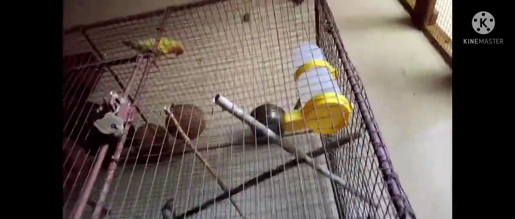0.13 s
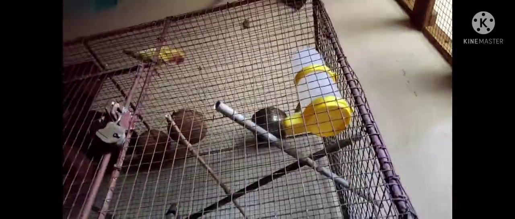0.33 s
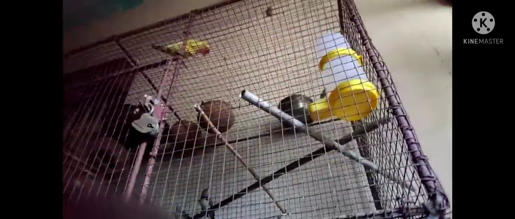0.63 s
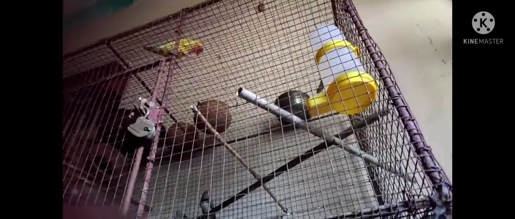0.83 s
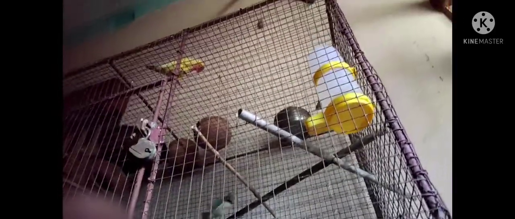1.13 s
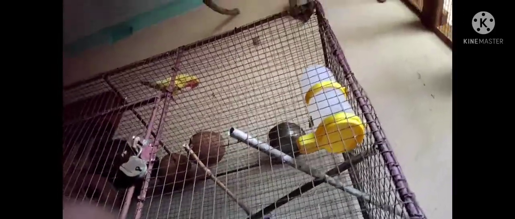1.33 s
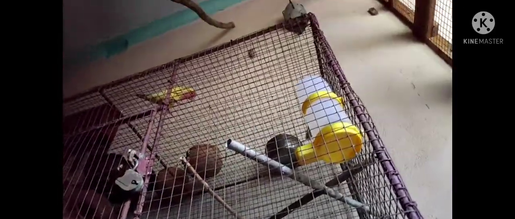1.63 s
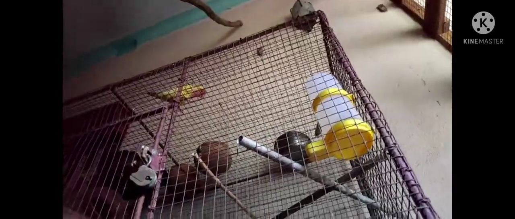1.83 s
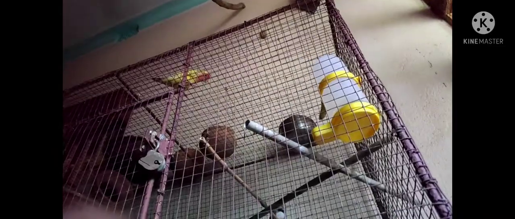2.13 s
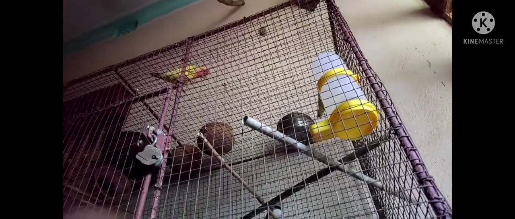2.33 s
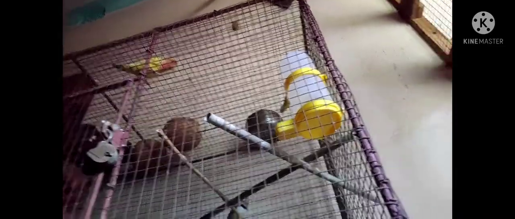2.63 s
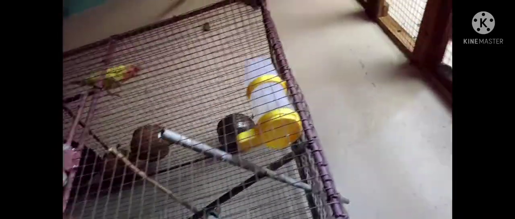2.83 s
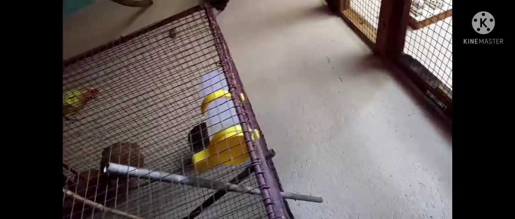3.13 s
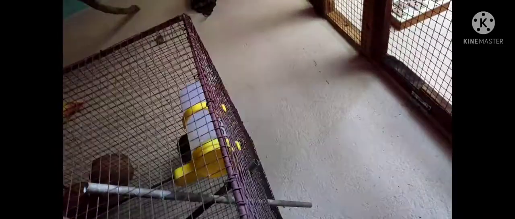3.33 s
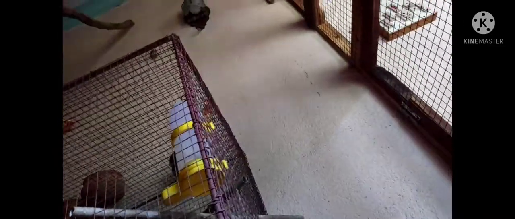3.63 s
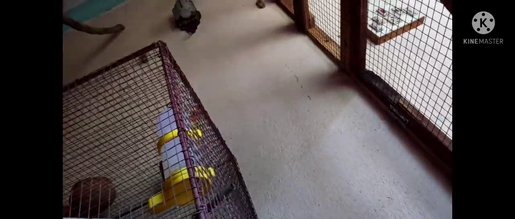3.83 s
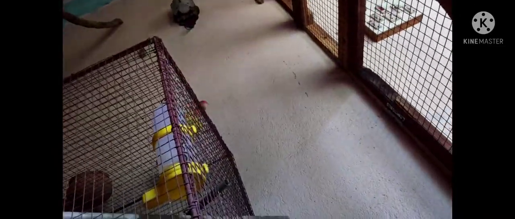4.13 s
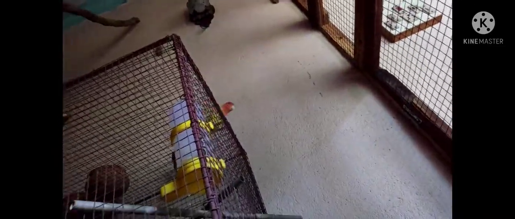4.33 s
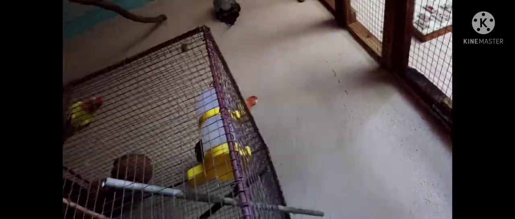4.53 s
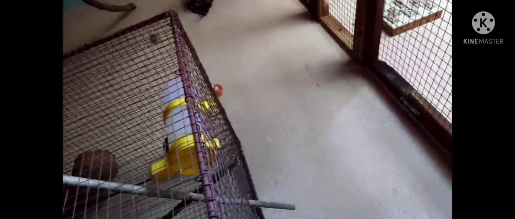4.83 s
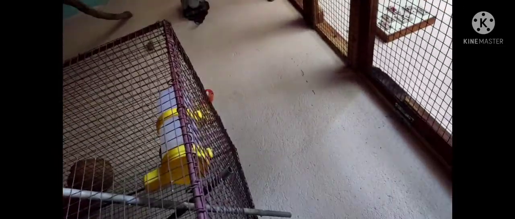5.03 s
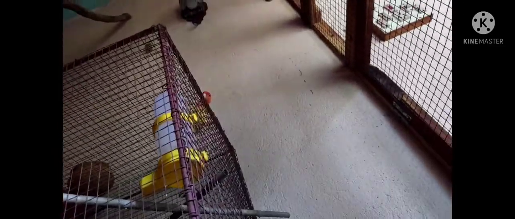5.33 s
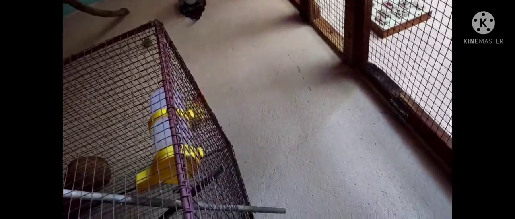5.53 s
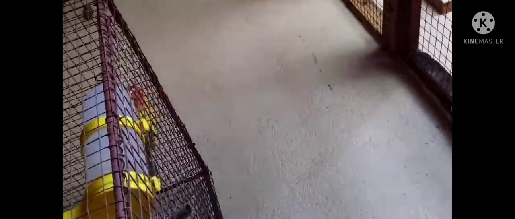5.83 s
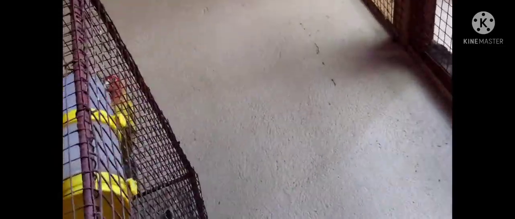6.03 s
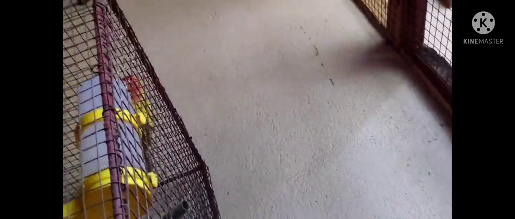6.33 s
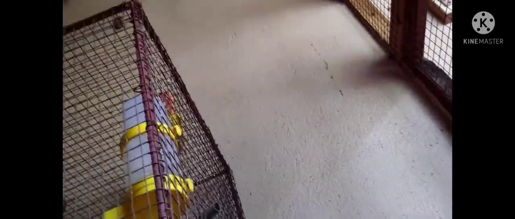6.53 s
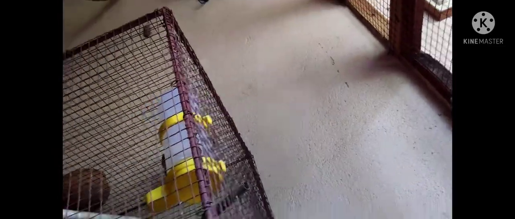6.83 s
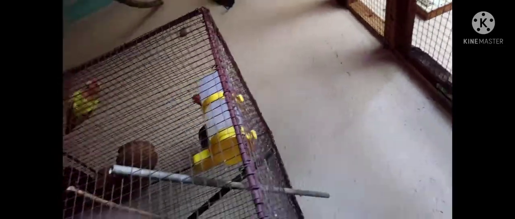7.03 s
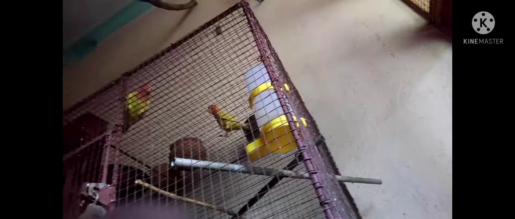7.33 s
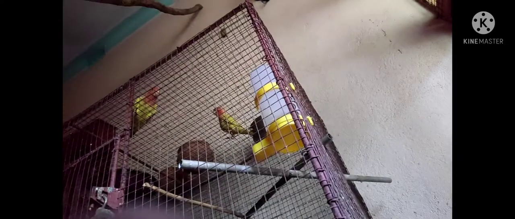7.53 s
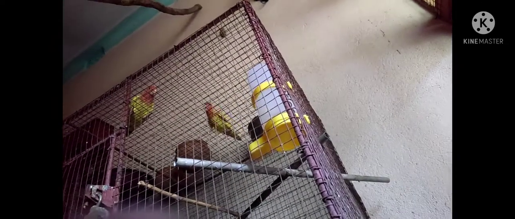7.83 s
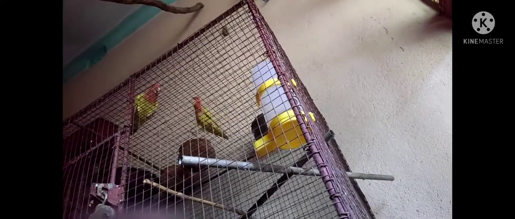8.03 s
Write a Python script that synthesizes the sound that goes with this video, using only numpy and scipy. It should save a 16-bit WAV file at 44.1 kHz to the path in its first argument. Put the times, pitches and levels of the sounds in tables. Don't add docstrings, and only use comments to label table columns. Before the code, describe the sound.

Shrill gliding whistles with a raspy edge ring briefly off hard walls. Isolated chirps lead to a rapid chattering screech, then quieter scuffs, another outburst with wingbeats, a short sharp call, and a final flurry over steady flapping. The hand-held microphone picks up dull bumps, bass rumble, faint room air, a far hum and a distant hoarse call.

```python
import sys
import numpy as np
from scipy import signal
from scipy.fft import rfft, irfft
from scipy.io import wavfile
from scipy.ndimage import uniform_filter1d, minimum_filter1d

SR = 44100
rng = np.random.default_rng(int(sys.argv[2]) if len(sys.argv) > 2 else 0)


def magnitude_from_level(level_db):
    exponent = np.asarray(level_db, float) / 20
    return 10 ** exponent


def int16_out(signal):
    q = np.round(np.clip(np.atleast_2d(signal).T, -1, 1) * 32767)
    wavfile.write(sys.argv[1], SR, q.astype(np.int16))


N = 360297


def evened(x):
    return x / np.sqrt(np.mean(x ** 2) + 1e-20)


def read(points, hz):
    f, value = np.transpose(points)
    return np.interp(np.log(hz + 1), np.log(f + 1), value)


def add(mix, s, sound):
    part = mix[..., round(s * SR):][..., :sound.shape[-1]]
    part += sound[..., :part.shape[-1]]


def coloured(x, spectrum):
    size = x.shape[-1]
    return irfft(rfft(x) * magnitude_from_level(read(spectrum, np.fft.rfftfreq(size, 1 / SR))), size)


def wander(size, hz):
    width = int(SR / hz)
    return evened(uniform_filter1d(uniform_filter1d(rng.standard_normal(size), width), width))


def curve(tables, column):
    t, value, gate = np.arange(N) / SR, np.zeros(N), np.zeros(N)
    for rows in tables:
        rows = np.array(rows)
        inside = (t >= rows[0, 0]) & (t < rows[-1, 0])
        value[inside] = np.interp(t[inside], rows[:, 0], rows[:, column])
        gate[inside] = signal.windows.tukey(inside.sum(), .2)
    return value, gate


# frequency in Hz, likeness 0 to 1.
LIKENESS = [(30, 0.47), (300, 0.97), (600, 0.66), (1200, 0.26), (8000, 0.099)]


def pair(spectrum):
    a, b = rfft(rng.standard_normal((2, N)))
    hz = np.fft.rfftfreq(N, 1 / SR)
    same = np.clip(read(LIKENESS, hz), 0, 1)
    right = same * a + np.sqrt(1 - same ** 2) * b
    return evened(irfft(np.array([a, right]) * magnitude_from_level(read(spectrum, hz)), N))


# frequency in Hz, difference in dB.
PORT_SHADE = [(1000, 2), (3500, 1), (5000, -6.5), (7000, -12.5), (9000, -10.5), (12000, 0.5)]


def ports(x):
    return np.array([coloured(x[0], PORT_SHADE), x[1]])


# frequency in Hz, level in dB.
AIR_COLOUR = [(12, -37.5), (20, 6), (69, -16.5), (91, -14), (233, -17), (307, -16), (505, -22), (685, -22),
              (1160, -26.5), (2440, -30.5), (3120, -30), (5140, -35), (14700, -46.5)]


def room_air():
    return magnitude_from_level(-59 + 3.5 + 2.23 * wander(N, hz=15)) * pair(AIR_COLOUR)


# time in seconds, level in dB.
RUMBLE_LEVEL = [(0.0, -66), (0.2, -43.5), (1.14, -57.5), (1.48, -46), (1.55, -62), (1.75, -59),
                (1.87, -40.5), (2.43, -66), (4.0, -46), (4.05, -57.5), (6.78, -54), (7.87, -38.5),
                (7.96, -58), (8.17, -64)]


def handling_rumble():
    lumps = pair([(18, 5.0), (30, -2.5), (70, 0.0), (150, -19.0), (400, -50.0)])
    level_db = np.interp(np.arange(N) / SR, *np.transpose(RUMBLE_LEVEL))
    return magnitude_from_level(level_db) * lumps * magnitude_from_level([[3.5], [-5.5]])


# time in seconds, level in dB.
HUM_LEVEL = [(0.0, -65), (1.05, -66), (2.25, -103), (3.82, -54.5), (6.24, -70.5), (7.55, -64), (8.17, -86)]


def far_hum():
    t = np.arange(N) / SR
    level_db = np.interp(t, *np.transpose(HUM_LEVEL)) + 1.3 * wander(N, hz=20)
    return magnitude_from_level(level_db) * np.sin(2 * np.pi * 687 * t + 0.199 * wander(N, hz=6.7))


# time in seconds, level in dB, pitch in Hz.
FAR_CALL = [
    (4.9, -90, 2300),
    (5.002, -51, 2392),
    (5.46, -71, 2620),
]


def far_call():
    db, gate = curve([FAR_CALL], column=1)
    turns = np.cumsum(curve([FAR_CALL], column=2)[0]) / SR
    hoarse = np.array([wander(N, hz=856), wander(N, hz=894)])
    return magnitude_from_level(db) * gate * hoarse * np.sin(2 * np.pi * turns)


# start in seconds, low push in dB, tick in dB against the push.
THUMP_EVENTS = [(0.169, -29.5, -10), (0.216, -42, -7), (0.222, -47, 1), (0.226, -50, -17),
                (1.318, -38, -17), (1.364, -35, -19), (1.448, -30.5, -22.5), (1.49, -55, -8),
                (.25, -55, -5), (1.876, -32.5, -14), (4.53, -29.5, -28), (5.469, -39.5, -28.5),
                (6.414, -41, -16.5), (6.48, -38, -23)]


def thumps():
    out, t = np.zeros((2, N)), np.arange(4000) / SR
    push = 1.84 * np.sin(2 * np.pi * 45 * t) * np.exp(-t / 0.0068)
    push += 0.52 * np.sin(2 * np.pi * 170 * t) * np.exp(-t / 0.0094)
    push = push * magnitude_from_level([[2.5], [-2.5]])
    noise = uniform_filter1d(rng.standard_normal((len(THUMP_EVENTS), 2, 4000)), size=3)
    ticks = signal.lfilter([1, -1], [1, -1.6, .66], noise) * np.exp(-t / 0.0039)
    for (s, db, tick_db), tick in zip(THUMP_EVENTS, ticks):
        add(out, s, magnitude_from_level(db) * (push + magnitude_from_level(tick_db + 13.5) * tick))
    return out


# time in seconds, level in dB, beats per second.
FLUTTER_BOUTS = [
    [(3.56, -44, 19.1), (3.73, -37, 16.15), (4.02, -39.5, 17.5)],
    [(4.15, -44, 17.04), (4.43, -52, 17.1), (4.46, -58, 13.2)],
    [(6.77, -38.5, 16.74), (7.64, -37, 15.8), (7.96, -43.5, 19)],
]
# frequency in Hz, level in dB.
WING_COLOUR = [(71, -23.5), (120, -10), (162, -5), (201, -13.5), (465, -4.5), (1340, -18), (3540, -21),
               (4160, -28), (7260, -21.5), (11000, -33), (14000, -47.5)]


def flutter():
    db, gate = curve(FLUTTER_BOUTS, column=1)
    beat_hz = curve(FLUTTER_BOUTS, column=2)[0] * (1 + .2 * wander(N, hz=21.95))
    turns = np.cumsum(beat_hz) / SR
    puffs = 1.48 + np.sin(np.pi * turns) ** 2 * magnitude_from_level(8.2 * wander(N, hz=40.3))
    air = pair(WING_COLOUR)
    low = uniform_filter1d(uniform_filter1d(air, 16), 16)
    hiss = air - low
    return magnitude_from_level(db - 3.5) * gate * (evened(puffs) * low + hiss)


# start in seconds, level in dB, rise in seconds, drag in seconds, treble in dB.
SCUFF_EVENTS = [(0.136, -38.5, 0.013, 0.027, -33.5), (1.008, -38, 0.0058, 0.066, 0.5),
                (1.871, -42.5, 0.0046, 0.025, -27), (2.844, -40, 0.034, 0.064, 11),
                (3.314, -49.5, 0.0074, 0.23, -0.5), (3.363, -43, 0.0031, 0.04, -18),
                (3.989, -36, 0.004, 0.019, -14.5), (4.249, -47, 0.028, 0.09, 4.5),
                (5.158, -66.5, 0.0041, .015, 5.5), (5.243, -51.5, .012, .05, -19.5),
                (6.09, -58, 0.022, 0.044, 0), (6.35, -63, 0.035, 0.061, 4.5),
                (6.43, -62.5, 0.031, .06, -4.5), (7.579, -56, .002, .008, -16), (7.64, -50, .002, .008, -8),
                (6.742, -50, 0.03, 0.25, -2), (7.844, -43, 0.0055, 0.047, 6.5)]
# frequency in Hz, level in dB.
GRIT_COLOUR = [(120, -45), (200, -11), (842, -4.5), (1160, -9), (1820, -10), (2110, -5), (4810, -6),
               (6300, -3.5), (11400, -19.5), (14700, -36.5)]


def scuffs():
    grains = rng.standard_normal((2, N)) * magnitude_from_level(1.63 * wander(N, hz=294))
    grit = evened(coloured(grains, GRIT_COLOUR))
    dull = uniform_filter1d(grit, 12)
    treble = grit - dull
    out, t = np.zeros((2, N)), np.arange(14000) / SR
    for s, db, rise_s, drag_s, treble_db in SCUFF_EVENTS:
        at = slice(round(s * SR), round(s * SR) + len(t))
        drag = np.exp(-np.maximum(t - rise_s, 0) / drag_s)
        stroke = magnitude_from_level(db) * np.clip(t / rise_s, 0, 1) * drag
        add(out, s, stroke[:dull[0, at].size] * (dull[:, at] + magnitude_from_level(treble_db) * treble[:, at]))
    return out


# start in seconds, length in seconds, top level in dB, end level in dB.
MURMUR_EVENTS = [
    (2.112, 0.14, -44.5, -60.5),
    (2.29, .062, -47, -42),
    (5.535, .12, -39, -34),
    (6.36, .08, -42.5, -46.5),
    (.395, 0.066, -44, -52),
]
MURMUR_PITCH_HZ = (539, 584, 596)


def murmurs():
    start_hz, top_hz, end_hz = MURMUR_PITCH_HZ
    top_share, start_db = 0.28, -19
    return [[(s, db + start_db, start_hz), (s + top_share * length, db, top_hz), (s + length, end_db, end_hz)]
            for s, length, db, end_db in MURMUR_EVENTS]


# frequency in Hz, level in dB.
NOSE_COLOUR = [(500, -22), (1200, -14), (1800, -17), (2600, -3.5), (4000, 0), (5400, -1), (7000, -7),
               (14000, -41.5)]


def nasal():
    calls = murmurs()
    db, gate = curve(calls, column=1)
    hz = curve(calls, column=2)[0] * (1 + 0.0053 * wander(N, hz=119.5))
    phase = 2 * np.pi * np.cumsum(hz) / SR
    pulses = sum(np.cos(k * phase + k * k) for k in range(1, 20))
    voice = coloured(gate * pulses, NOSE_COLOUR)
    voice *= 1 + 0.47 * wander(N, hz=507)
    return magnitude_from_level(db - 3.5) * gate * voice / np.sqrt(np.mean(voice[gate > .5] ** 2))


# multiple of the pitch, level in dB.
WHISTLE_OVERTONES = [(2, -8.5), (3, -16)]
# frequency in Hz, lift in dB.
BEAK_LIFT = [(4000, -14), (7000, 5), (8500, -4.5), (10300, -8), (12500, -10), (15000, -11)]


def whistle(hz, sides, octave_db, lead_turns):
    phase = 2 * np.pi * np.cumsum(hz) / SR
    apart = 2 * np.pi * np.array([[0], [lead_turns]])
    tone = sides * np.sin(phase + apart)
    for k, over_db in list(WHISTLE_OVERTONES) + [(2, octave_db)]:
        shade = magnitude_from_level([read(PORT_SHADE, k * hz), 0 * hz])
        level = magnitude_from_level(over_db + read(BEAK_LIFT, k * hz)) * (k * hz < 16000)
        tone += shade * level * np.sin(k * phase + apart)
    return tone


# start in seconds, level in dB.
SCREECH_EVENTS = [
    (2.3515, -21),
    (3.997, -22),
    (7.92, -19.5),
]
# delay in seconds, length in seconds, start in Hz, slide in Hz/s, level in dB.
SCREECH_OPENING = [
    (0, 0.01, 6900, 7000, -2),
    (0, .009, 4424, 90000, 3),
    (.007, 0.014, 5600, 80000, 4),
]
# start in seconds, length in seconds, start pitch in Hz, level in dB.
RISING_NOTES = [(2.368, 0.019, 4280, -18.5), (2.405, 0.02, 3977, -18), (2.525, 0.019, 4206, -13.5),
                (2.582, 0.033, 5960, -20.5), (2.715, .016, 4100, -13), (3.716, 0.011, 3386, -28),
                (3.822, 0.016, 4200, -31), (4.007, 0.01, 4310, -14), (4.147, 0.021, 4484, -16),
                (5.722, 0.015, 5310, -15.5), (5.733, 0.018, 6150, -15), (6.807, 0.0092, 4245, -14),
                (6.815, 0.024, 3420, -30), (6.878, .008, 5400, -20), (7.113, .014, 3920, -20),
                (7.152, 0.018, 4450, -24), (7.163, 0.0038, 4453, -13), (7.925, 0.0066, 7340, -23),
                (8.088, 0.013, 5970, -20), (8.133, 0.015, 3750, -17)]
# start in seconds, length in seconds, start pitch in Hz, level in dB.
FALLING_NOTES = [(0, 0.017, 5800, -21), (2.377, .009, 4310, -24), (2.442, 0.019, 6950, -21),
                 (2.592, .025, 5470, -23), (2.638, 0.014, 4460, -15.5), (2.677, 0.0077, 4240, -17.5),
                 (3.701, 0.018, 4710, -31), (3.853, 0.018, 5520, -13.5), (4.028, 0.022, 5640, -25.5),
                 (5.658, 0.007, 4440, -30), (6.806, 0.053, 8150, -26.5), (6.813, 0.014, 5410, -24)]
# start in seconds, length in seconds, pitch in Hz, level in dB.
HELD_NOTES = [(.03, 0.023, 4500, -25), (2.361, 0.015, 3180, -25), (2.399, 0.017, 2490, -28.5),
              (2.425, 0.024, 4280, -16), (2.39, 0.028, 4760, -22.5), (2.362, 0.043, 2350, -36),
              (2.53, 0.022, 4000, -18), (2.648, .016, 3860, -16.5), (2.688, 0.021, 3740, -17),
              (2.722, 0.03, 3760, -22.5), (2.729, 0.0083, 4950, -13.5), (2.454, 0.01, 3940, -13.5),
              (2.475, 0.054, 3215, -26.5), (2.498, 0.018, 3980, -16), (2.617, 0.036, 2623, -29.5),
              (2.665, 0.08, 3205, -29), (2.751, 0.01, 5030, -21.5), (2.821, .022, 3710, -25.5),
              (3.727, 0.012, 4090, -24.5), (3.831, 0.036, 4650, -14.5), (3.701, 0.0065, 2500, -33.5),
              (3.998, 0.0077, 3940, -15), (4.015, .019, 4770, -12.5), (4.053, 0.0098, 4005, -17.5),
              (4.11, 0.026, 4130, -18.5), (4.042, 0.036, 2405, -34.5), (4.071, 0.02, 4120, -16),
              (4.106, 0.03, 3870, -22.5), (4.133, 0.018, 3130, -22.5), (4.151, .031, 3928, -14),
              (4.165, 0.017, 4670, -16.5), (7.122, .044, 4170, -15), (5.255, .05, 1100, -64),
              (1.774, .012, 4147, -29), (7.934, 0.014, 3110, -25.5), (7.953, .03, 2330, -30),
              (7.938, 0.011, 3980, -25), (7.987, 0.01, 5040, -27.5), (7.997, 0.044, 4133, -16),
              (8.028, 0.03, 3790, -21.5), (8.072, 0.015, 3834, -12.5), (8.1, 0.065, 2576, -29),
              (8.101, 0.037, 5180, -24), (5.667, .034, 4460, -11)]
# start in seconds, length in seconds, pitch in Hz, level in dB.
SHRILL_NOTES = [(.035, 0.0203, 5550, -12), (2.371, 0.0176, 7270, -26), (2.617, 0.017, 6330, -21.5),
                (2.644, .03, 6590, -22), (4.089, 0.017, 6645, -20.5), (5.665, 0.0094, 6620, -22),
                (6.828, 0.037, 6280, -32), (6.883, 0.0448, 6204, -13), (6.899, 0.0076, 5610, -10),
                (8.047, 0.021, 5860, -21), (8.069, 0.031, 7750, -30), (8.146, 0.01, 6560, -9.5)]
# start in seconds, length in seconds, start pitch in Hz, end pitch in Hz, level in dB.
SPLIT_NOTES = [
    (5.699, .038, 5004, 5170, -16),
    (6.841, .042, 4538, 4980, -15.5),
    (7.947, 0.036, 4710, 4693, -19.5),
]
# multiple of the pitch, level in dB.
SPLIT_SIDE_TONES = [(.5, -15.5), (1.5, -11.5)]
# start in seconds, length in seconds, pitch in Hz, level in dB.
FAR_STEADY_TONE = (.358, .38, 812, -67)


def notes():
    rows = [(s + delay, length, hz, hz + slide * length, db + part_db)
            for s, db in SCREECH_EVENTS for delay, length, hz, slide, part_db in SCREECH_OPENING]
    held = list(HELD_NOTES) + list(SHRILL_NOTES)
    for table, slide_hz_per_s in ((RISING_NOTES, 24000), (FALLING_NOTES, -14000), (held, 330)):
        rows += [(s, length, hz, hz + slide_hz_per_s * length, db) for s, length, hz, db in table]
    parts = [(0.99, 0.0064)] + list(SPLIT_SIDE_TONES)
    rows += [(s, length, k * hz, k * end_hz, db + side_db)
             for s, length, hz, end_hz, db in SPLIT_NOTES for k, side_db in parts]
    s, length, hz, db = FAR_STEADY_TONE
    return rows + [(s, length, hz, hz, db)]


# start in
# seconds, length in seconds, start pitch in Hz, top pitch in Hz, level in dB.
CHIP_CLIMBS = [(0, 0.022, 4050, 5200, -27), (.4825, .0095, 3660, 4650, -22),
               (.494, .008, 4500, 5250, -20.5), (.8385, 0.0087, 3400, 4400, -17.5),
               (1.7555, .0075, 2880, 4150, -21), (3.5425, 0.00914, 3880, 4300, -18.5),
               (7.681, 0.014, 4070, 4750, -15.5), (7.696, 0.042, 2080, 2320, -45),
               (8.01, .007, 5400, 6500, -21), (4.053, .008, 5500, 6500, -25),
               (3.848, 0.0065, 4900, 5900, -22)]
# start in seconds, length in seconds, start pitch in
# Hz, end pitch in Hz, level in dB.
CHIP_DROPS = [(.501, .005, 5250, 4250, -15), (.505, .008, 4250, 4100, -14), (.024, .012, 4500, 4600, -25),
              (.851, .014, 4900, 3100, -21.5), (1.766, 0.018, 3250, 2950, -32),
              (1.763, .006, 3800, 3900, -28.5), (3.556, .014, 3800, 3100, -27.5),
              (7.696, .011, 4600, 3600, -15.5), (7.711, .011, 4400, 4150, -18.5),
              (3.866, 0.02, 4500, 3900, -23), (7, .01, 6500, 7400, -27), (6.981, 0.0147, 3600, 3900, -23.5)]


def chips():
    return [(s, length, [a, a + bow * (b - a), b], db)
            for table, bow in ((CHIP_CLIMBS, 0.742), (CHIP_DROPS, .6)) for s, length, a, b, db in table]


# pitch in Hz, difference in dB.
NOTE_SHADE = [(2400, 3), (3300, 2), (4100, -1), (5000, -2), (5800, -7.5), (6500, -11.5), (7200, -28)]
# time in seconds, difference in dB.
CAMERA_AIM = [
    (0, 6),
    (.4, -1),
    (2.5, 1.5),
    (3.8, 1),
    (6.8, -0.5),
    (8.17, 2.5),
]
# frequency in Hz, level in dB.
RASP_COLOUR = [(880, -80.5), (1500, -39.5), (2220, -31.5), (3100, -15), (3540, -34), (4010, -7), (4940, -2),
               (6450, -11), (10300, -20), (12700, -19), (14700, -52)]
# frequency in Hz, level in dB.
PUFF_COLOUR = [(700, -33.5), (1300, -18.5), (2500, -13), (4000, 6.5), (6000, -4.5), (8000, -5),
               (12000, -29), (15000, -22.5)]


def chirps():
    scoop, onset_s = .02, 0.0028
    out, effort = np.zeros((2, N)), np.zeros((2, N))
    shake, throb = wander(N, hz=886), np.clip(wander(N, hz=247), -2, 2)
    calls = [(s, length, [a * (1 - scoop), (a + b) / 2, b], db, read(NOTE_SHADE, a), 0)
             for s, length, a, b, db in notes()]
    calls += [(s, length, path, db, -3, 1) for s, length, path, db in chips()]
    leads = rng.choice([-1, 1], len(calls)) / 4
    for (s, length, path_hz, db, pan_db, chip), lead_turns in zip(calls, leads):
        at = round(s * SR) + np.arange(int(length * SR))
        at = at[at < N]
        hz = np.polyval(np.polyfit([0, .5, 1], path_hz, 2), np.linspace(0, 1, len(at)))
        hz += np.minimum(66 + 50 * chip, hz / 30) * shake[at]
        taper = min(.4 - chip / 4, 2 * onset_s / length)
        shape = magnitude_from_level(db) * signal.windows.tukey(len(at), taper) * (1 + .4 * throb[at])
        balance_db = pan_db + np.interp(s, *np.transpose(CAMERA_AIM))
        sides = evened(magnitude_from_level(balance_db * np.array([[.5], [-.5]])))
        octave_db = -19.5 if chip else -80
        out[:, at] += np.sqrt(2) * shape * whistle(hz, sides, octave_db, lead_turns)
        effort[chip, at] += shape ** 2
    effort *= magnitude_from_level(4 * wander(N, hz=900))
    rasp, puff = [ports(evened(coloured(rng.standard_normal((2, N)), colour)))
                  for colour in (RASP_COLOUR, PUFF_COLOUR)]
    breath = magnitude_from_level(-10.0) * np.sqrt(effort[0]) * rasp + magnitude_from_level(-8.0) * np.sqrt(effort[1]) * puff
    return magnitude_from_level(-1.5) * out + breath


# frequency in Hz, time to fall 60 dB in seconds.
ROOM_T60 = [(300, 1), (1500, 0.73), (4000, 0.49), (8000, 0.54), (14000, 0.28)]


def room(x):
    taps = np.zeros((2, 60000))
    at = np.arange(160, 59980, 20) + rng.integers(0, 20, (2, 2991))
    np.put_along_axis(taps, at, rng.choice([-1., 1.], at.shape), 1)
    hz, t, z = signal.stft(taps, SR, nperseg=256)
    fall_db = -60 * t / read(ROOM_T60, hz)[:, None]
    decay = magnitude_from_level(fall_db) + magnitude_from_level(-18.0 + 0.5 * fall_db)
    tail = signal.istft(z * decay, SR, nperseg=256)[1]
    crossed = 0.79 * x + 0.051 * x[::-1]
    return signal.fftconvolve(crossed, tail / np.linalg.norm(tail[0]), axes=1)[:, :N]


def scene():
    background = room_air() + handling_rumble() + far_hum() + far_call()
    birds, floor, soft = chirps(), ports(scuffs()), ports(nasal() + np.zeros((2, 1)))
    near = magnitude_from_level(3.0) * birds + magnitude_from_level(9.5) * floor + magnitude_from_level(-1.5) * soft
    echo = room(magnitude_from_level(3.0) * birds + magnitude_from_level(4.0) * floor + magnitude_from_level(4) * soft)
    return near + echo + flutter() + thumps() + background


def limited(x):
    swing = uniform_filter1d(-minimum_filter1d(-abs(x).max(0), 120), 120)
    return x / (1 + (swing / .8) ** 6) ** (1 / 6)


# frequency in Hz, margin in dB.
BAND_MARGIN = [(500, 75), (1500, 51), (4000, 27), (7000, 32.5), (10000, 32), (13500, 39.5), (14600, 21.5)]


def weak_bands_emptied(x):
    hz, t, z = signal.stft(x, SR, nperseg=2048)
    band_hz = hz[4:1024:8, None]
    power = abs(z[:, :1024]).reshape(2, 128, 8, -1) ** 2
    band_db = 10 * np.log10(uniform_filter1d(power.mean((0, 2)), 3, axis=1) + 1e-14)
    chance = rng.standard_normal(band_db.shape)
    fits = evened(uniform_filter1d(uniform_filter1d(chance, 4, axis=1), 2, axis=0))
    loudest_db = band_db[6:].max(0) - (read(BAND_MARGIN, band_hz) + 2 + 6 * fits)
    near_db = -minimum_filter1d(-band_db, size=9, axis=0) - 21.5 - 5 * fits
    mask_db = np.maximum(loudest_db, np.where(band_hz > 1200, near_db, -200))
    kept = 1 / (1 + magnitude_from_level(8 * (mask_db - band_db)))
    z[:, :1024] *= np.repeat(np.maximum(kept, magnitude_from_level(-30)), 8, axis=0)
    z[:, hz > 14800] = 0
    return signal.istft(z, SR, nperseg=2048)[1][:, :N]


def top_cut(x):
    return signal.sosfilt(signal.butter(12, 14810, fs=SR, output="sos"), x)


def record(dry):
    mix = weak_bands_emptied(limited(dry))
    return top_cut(mix)


dry = scene()
out = record(dry)
int16_out(out)
```